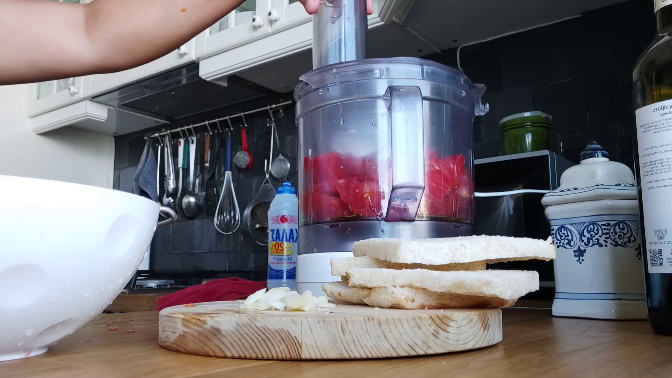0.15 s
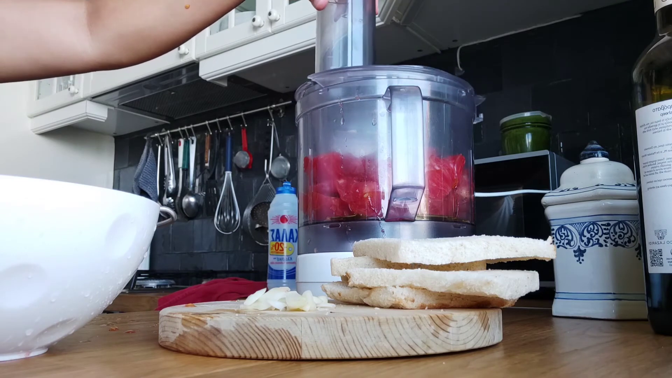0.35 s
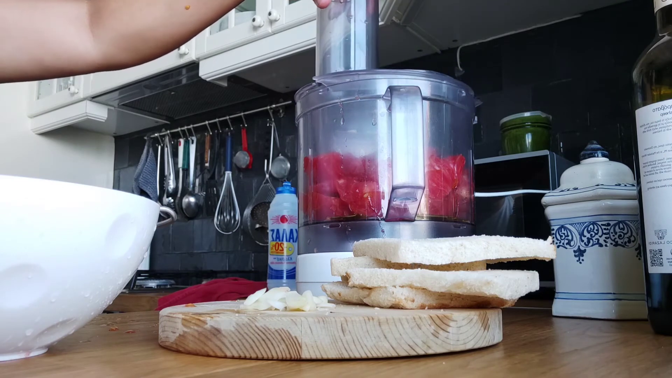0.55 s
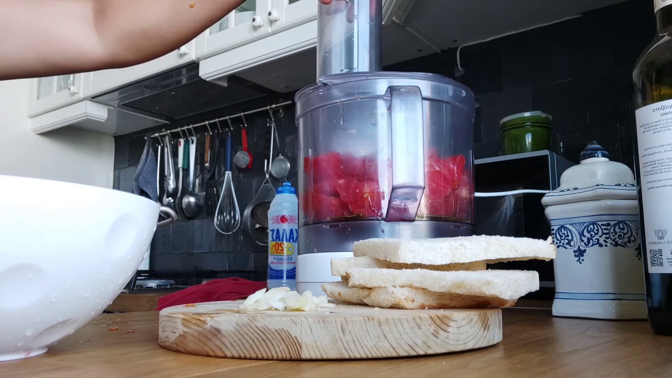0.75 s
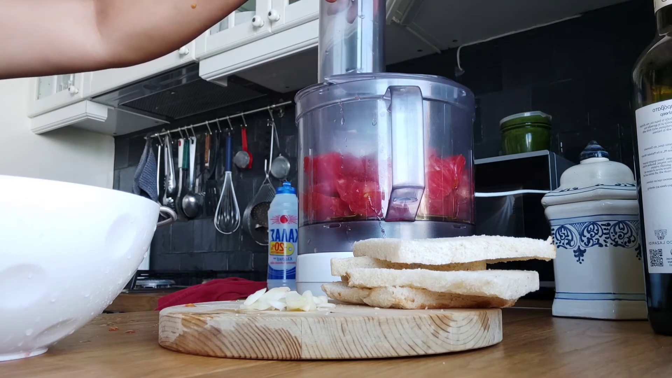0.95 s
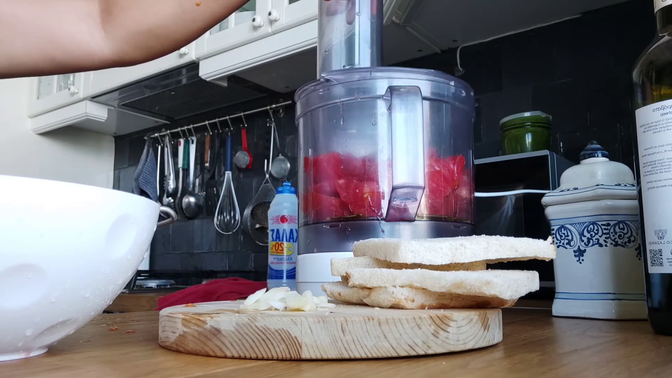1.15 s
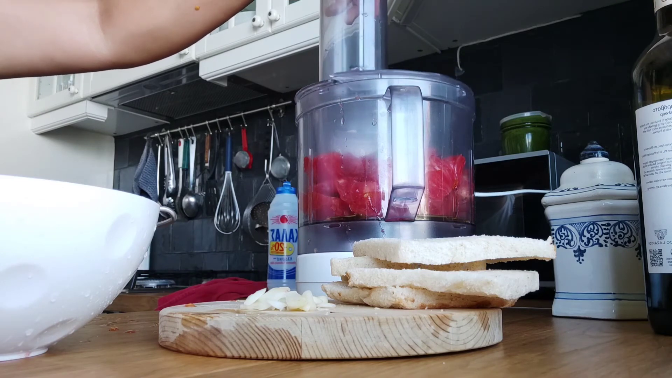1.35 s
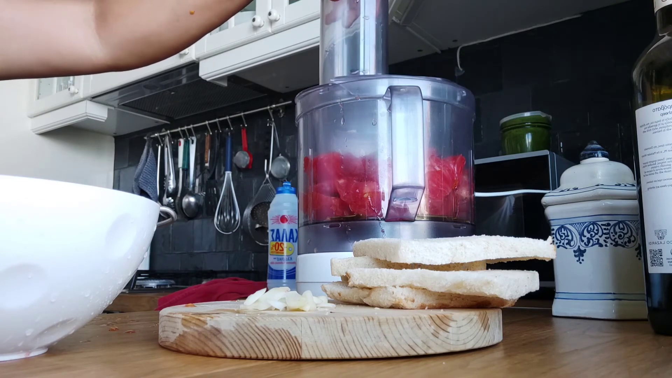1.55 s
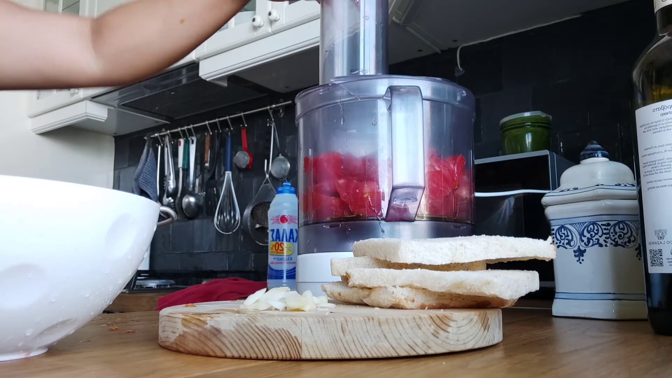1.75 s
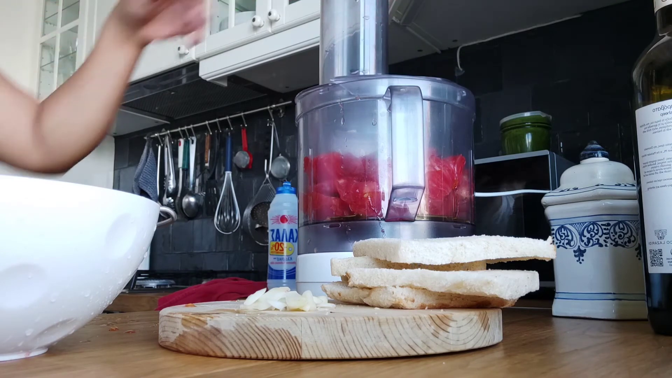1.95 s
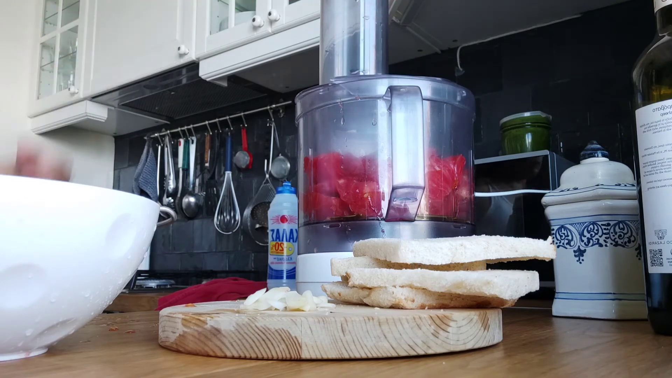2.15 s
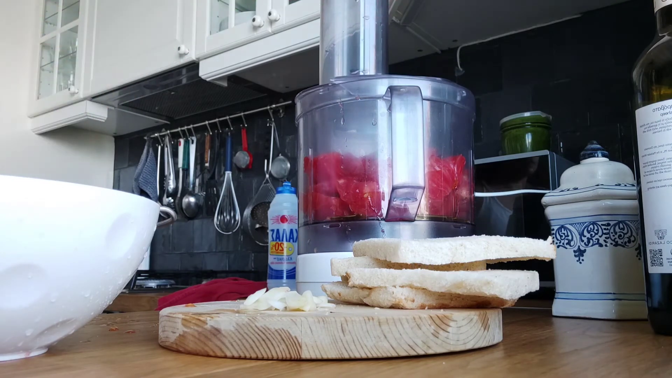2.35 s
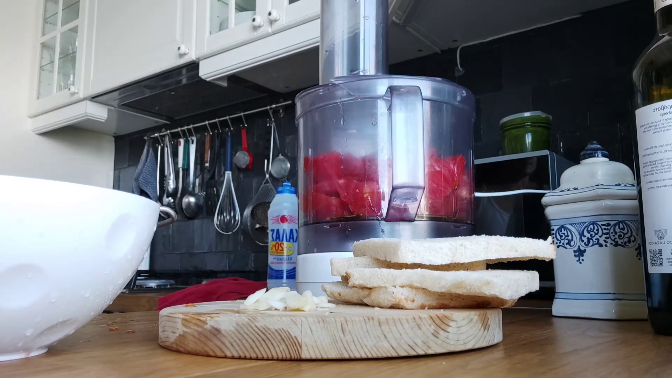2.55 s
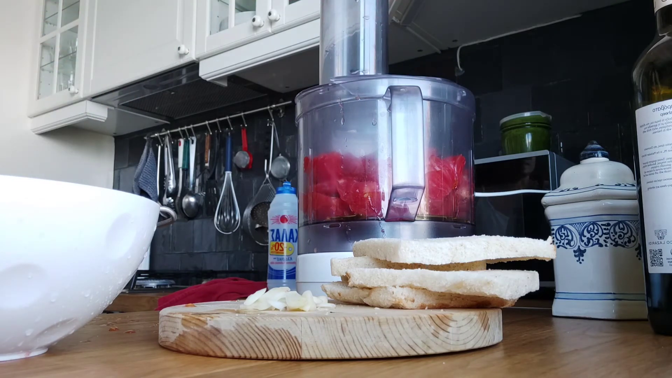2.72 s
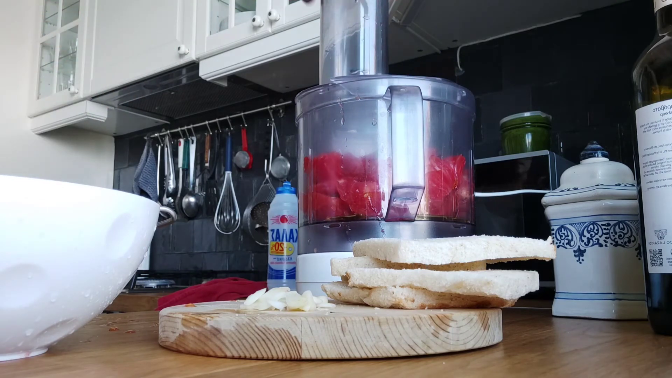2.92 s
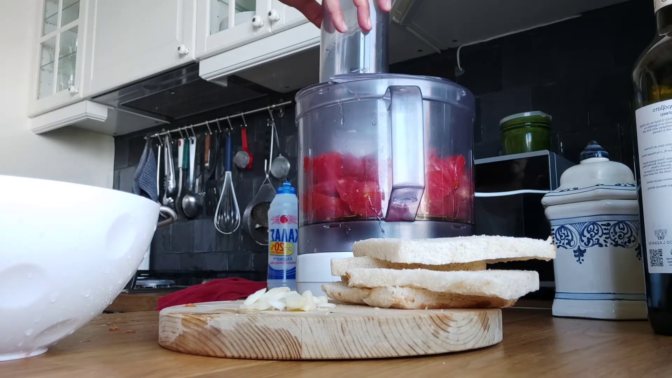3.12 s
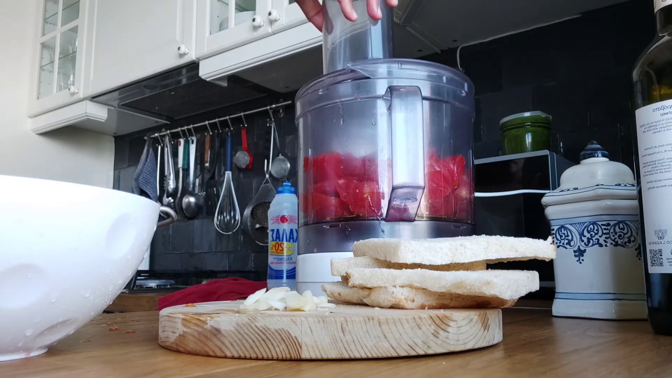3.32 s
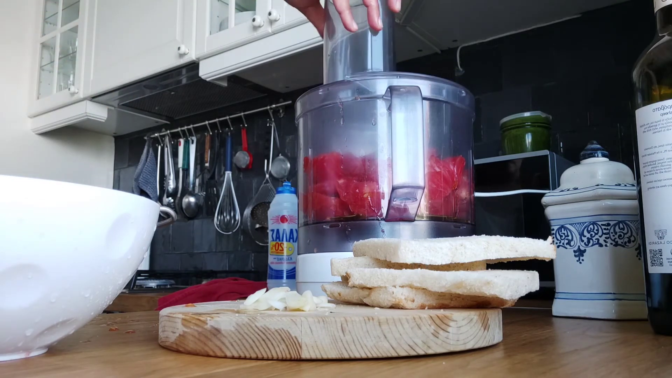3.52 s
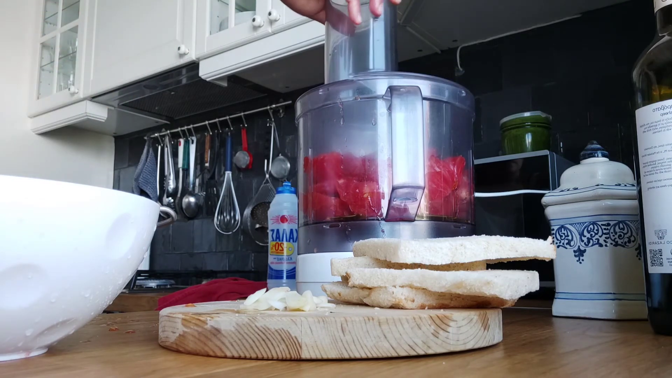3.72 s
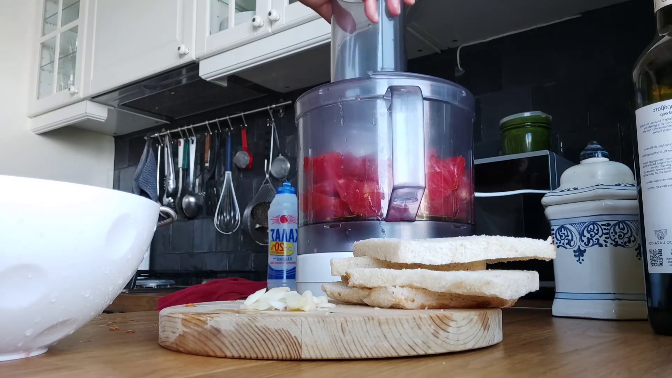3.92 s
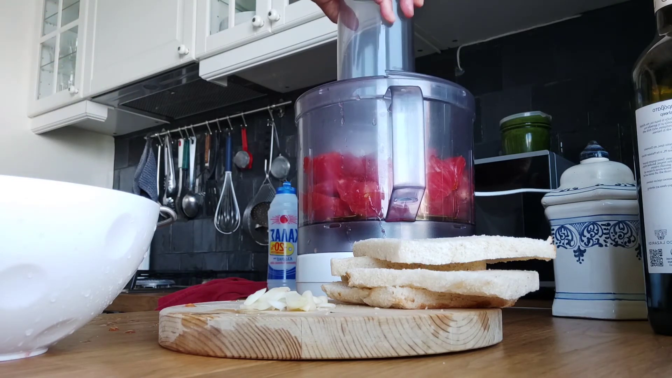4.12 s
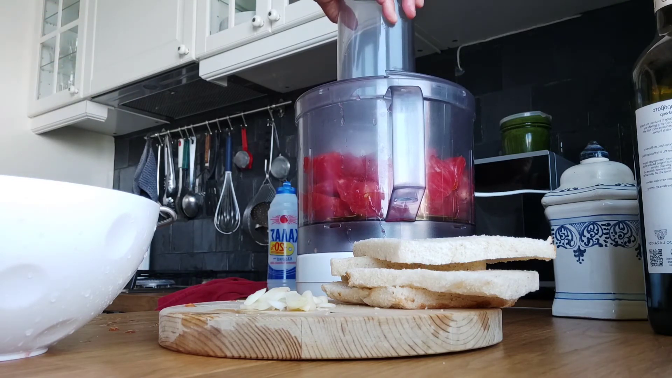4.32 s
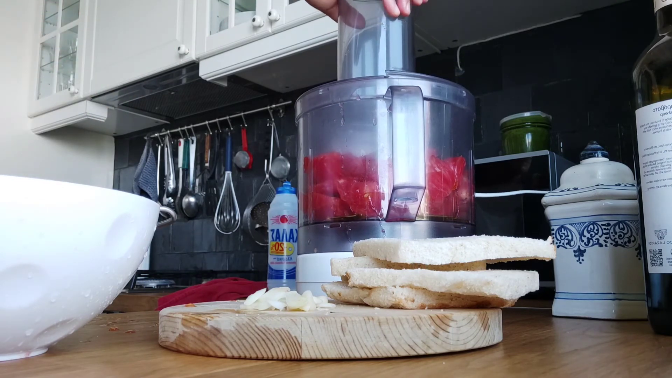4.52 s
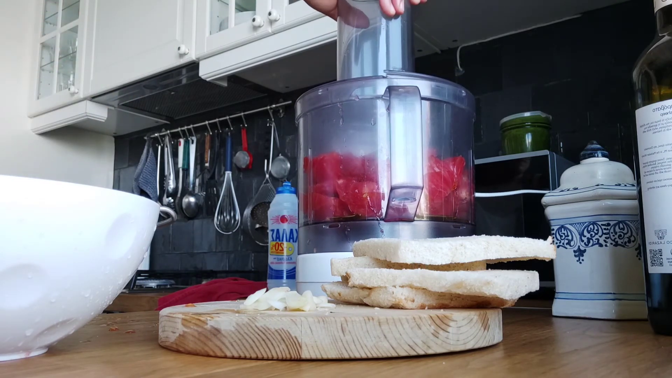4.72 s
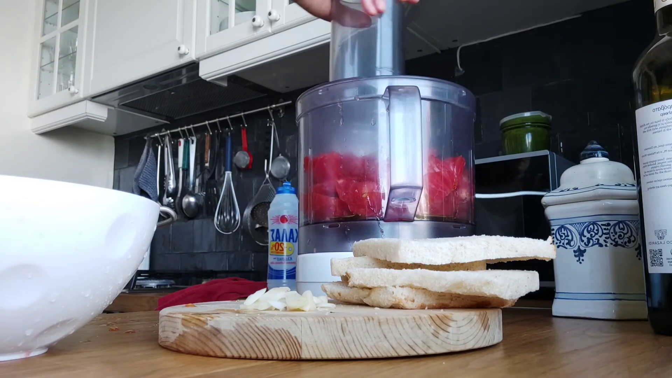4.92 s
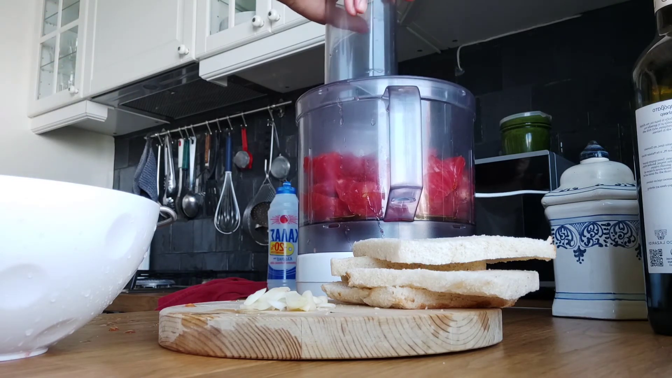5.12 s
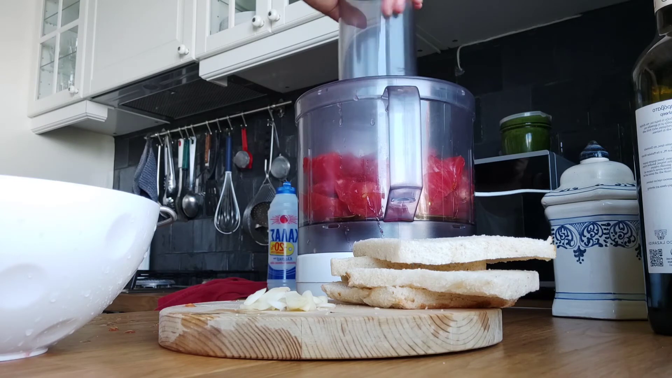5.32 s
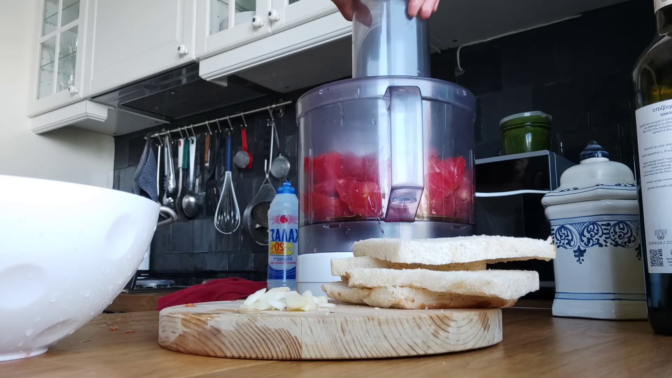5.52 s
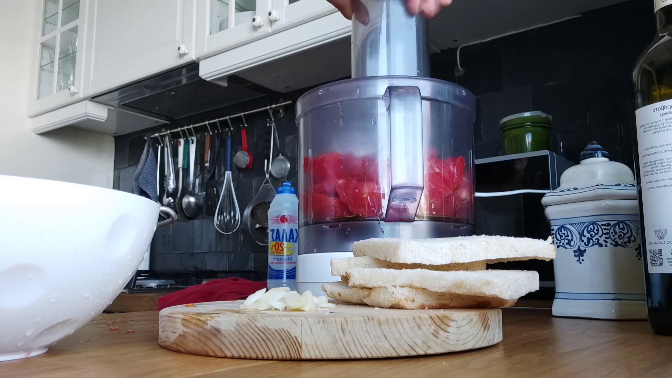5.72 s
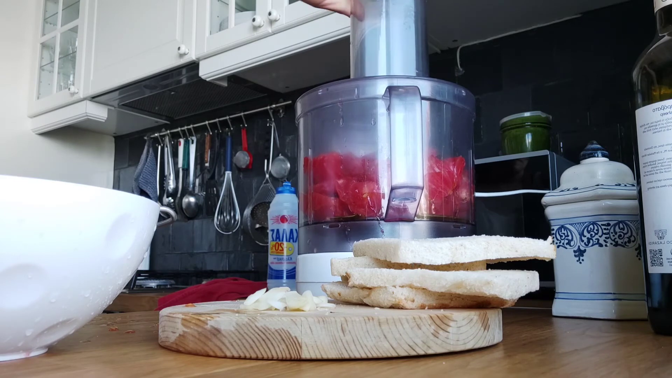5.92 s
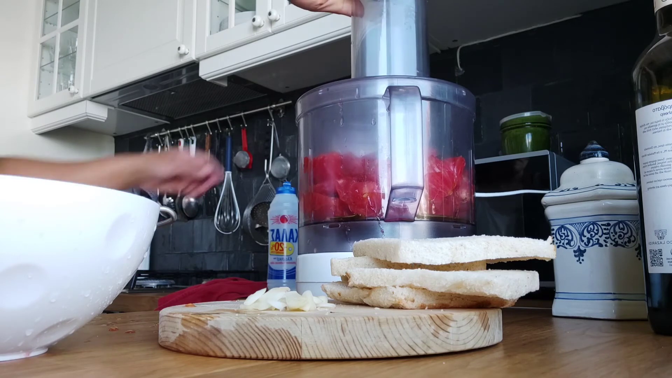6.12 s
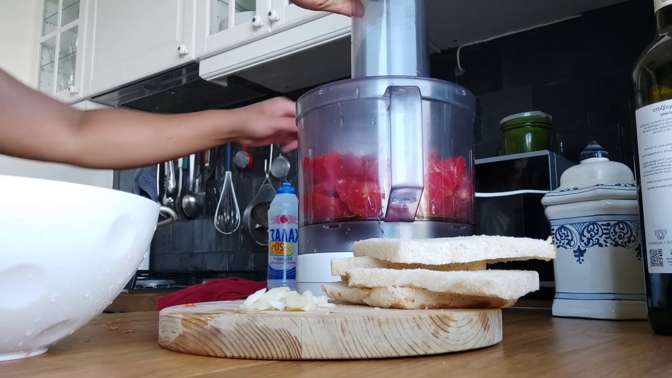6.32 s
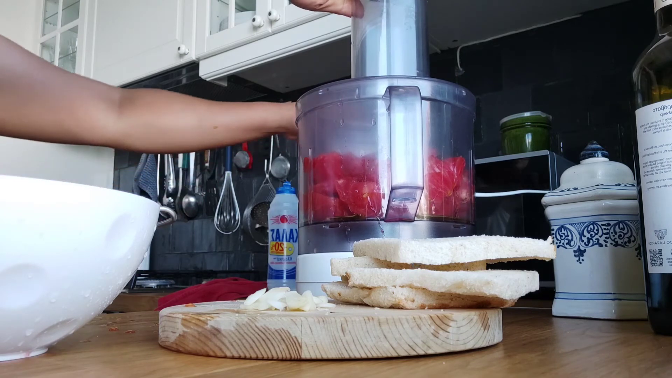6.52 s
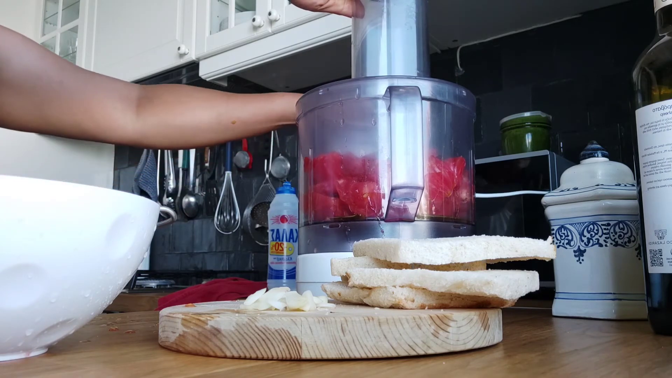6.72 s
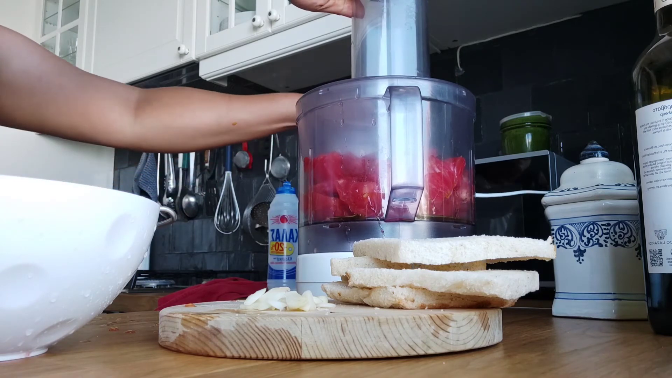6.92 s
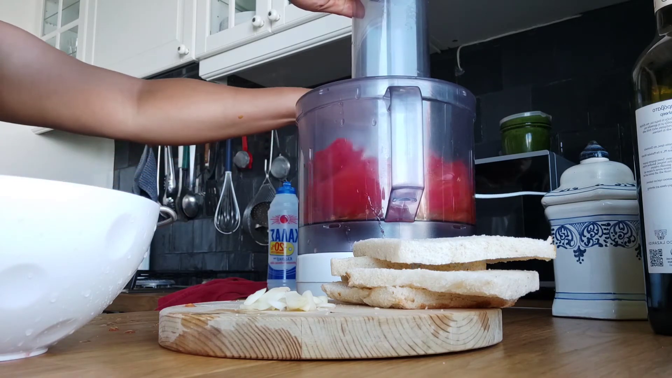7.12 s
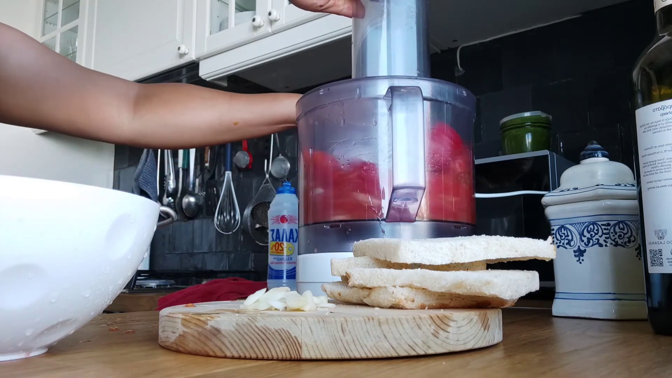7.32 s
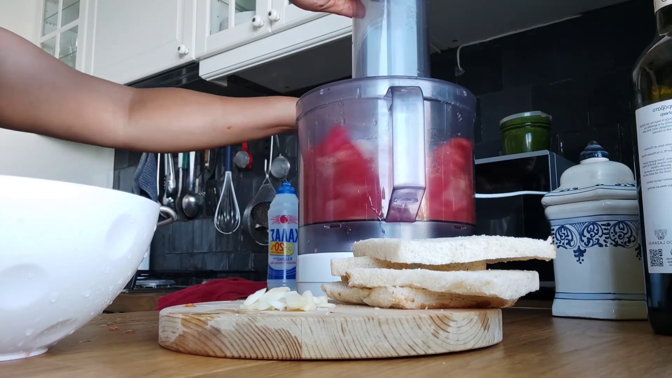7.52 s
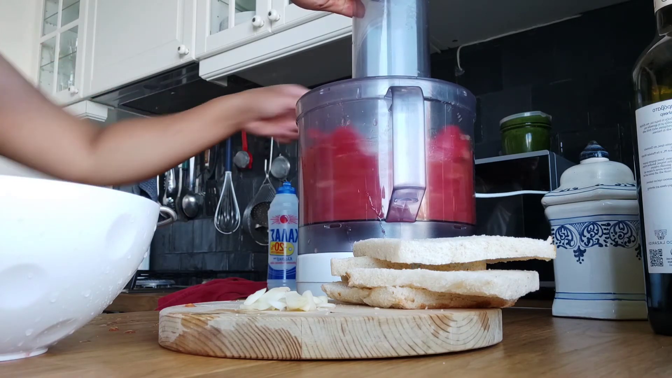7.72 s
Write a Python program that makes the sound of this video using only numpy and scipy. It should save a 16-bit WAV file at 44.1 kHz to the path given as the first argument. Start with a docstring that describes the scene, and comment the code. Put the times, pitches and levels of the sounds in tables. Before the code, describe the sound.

For the first 1.5 seconds, a plastic pusher clacks and rubs against a food processor's feed tube, making uneven, hollow knocks. A lull follows until about 3 seconds, with only low room rumble, microphone hiss and a faint rising hum. The knocks and scuffs resume irregularly, turning deeper as the pusher plugs the tube. At 4.9 seconds a hard knock starts a scraping, hissing slide, which ends in a sharp clack at 5.5 seconds as the pusher lands. A few light taps follow. At about 7.1 seconds the switch snaps and the motor leaps to speed with a loud, rough whine and a climbing squeal. The blades churn wet food, pieces slap the rattling bowl, and the machine is still running at the end, near 8 seconds. Everything is close, with a short kitchen echo.

```python
"""Food processor: pusher, then motor.

A plastic pusher rubs and knocks in the feed tube, ringing air column, wall and lid, then slides home.
The switch snaps, the motor whines up to speed and two knives churn food and throw it at the bowl.
A small kitchen echoes the blows and the rubbing; two hissy microphone ports colour everything."""
import sys
import numpy as np
from scipy import signal
from scipy.fft import rfft, irfft, next_fast_len
from scipy.io import wavfile

SR = 44100
rng = np.random.default_rng(int(sys.argv[2]) if len(sys.argv) > 2 else 0)


def digitize_waveform(pressure):
    """Quantize a signal to 16-bit integers and store it at the path in sys.argv[1].

    Rows of a 2-D input are taken as channels; values are limited to [-1, 1].
    """
    field = np.atleast_2d(pressure).T
    bounded = np.clip(field, -1, 1)
    quanta = np.round(bounded * 32767).astype(np.int16)
    wavfile.write(sys.argv[1], SR, quanta)


N = 346626
TIME = np.arange(N) / SR
LAND_S, START_S = 5.51, 7.11  # pusher lands, motor starts
DRIVE_HZ = 1070  # nominal drive tone

# Stereo likeness of noise. Each row: frequency in Hz, left-right correlation.
CORRELATION = [(50, 0.9), (200, 0.95), (500, 0.56), (1000, 0.078), (2200, 0.08), (4000, 0.011)]
# Room rumble and microphone hiss. Each row: frequency in Hz, density in dB per Hz.
FLOOR_DB = [(20, -74), (60, -77.5), (130, -82), (400, -82), (700, -86), (1050, -88), (1500, -99),
            (2400, -92.5), (3800, -99.5), (4400, -83), (6000, -83.5), (9000, -88.5), (10000, -101),
            (15000, -103)]
# Faint rising hum. Each row: time in seconds, pitch in Hz, level in dB.
HUM_TRACK = [(1.4, 57.7, -70), (1.9, 61.5, -49.5), (2.65, 65.7, -55.5), (3.0, 69.4, -63), (3.4, 68.6, -74)]
# Hum harmonics. Each row: multiple, gain in dB.
HUM_HARMONICS = [(1, 0), (3, -17), (6, -8)]

# Level curves. Each row: time in seconds, level in dB.
RIM_DB = [(0, -42), (.45, -62), (.7, -56), (1.25, -54.5), (1.4, -53), (1.6, -54), (1.8, -78)]  # pusher pressing on the rim
SLIDE_DB = [(4.93, -20), (5.09, -23.5), (5.22, -42), (5.5, -44)]  # sliding hiss, fading as the pusher slows
WHINE_DB = [(7.2, -43), (7.33, -41), (7.36, -30.5), (7.48, -29), (7.53, -40), (7.59, -33.5), (7.75, -32.5),
            (7.86, -37)]  # main motor whine
GRIND_DB = [(7.14, -46), (7.18, -34.5), (7.31, -36), (7.42, -44), (7.55, -41), (7.72, -38), (7.86, -40)]  # rough whine of the loaded drive

# Noise spectra. Each row: frequency in Hz, gain in dB.
SCRAPE_EQ = [(100, -37), (200, 4), (600, 6), (1100, 7.5), (1700, 6.5), (2800, 3.5), (3800, -1.5),
             (6000, 3.5), (9000, 7), (16000, -10)]  # scraped plastic
PLASTIC_EQ = [(50, -3.5), (110, -8.5), (170, 1.5), (260, -2.5), (400, 2), (600, 3.5), (800, -4), (1050, 0),
              (1400, -6.5), (2700, -7.5), (4000, -18.5), (8000, -14.5), (16000, -8)]  # struck plastic
RUB_EQ = [(70, -36), (130, -12), (175, -1), (215, 2), (260, -15), (480, -8), (800, -15), (1500, -23),
          (4000, -31)]  # pusher binding
CHURN_EQ = [(25, -19), (40, -21), (60, -18), (80, 1.5), (125, -5), (150, 0), (290, 1.5), (345, -1.5),
            (390, 7), (500, 1.5), (700, 3), (800, -5), (1200, -23)]  # churned food
BOWL_EQ = [(500, -13), (770, -8), (855, -0.5), (900, -5), (980, 1.5), (1030, 3), (1085, 7.5), (1150, -1),
           (1200, -6), (1300, -16.5), (2500, -31.5)]  # rattling bowl
AIR_EQ = [(600, -5), (1300, 2.5), (1800, 2), (2300, 0.5), (3200, -3.5), (4000, -11.5), (5000, -13),
          (5900, -3), (6500, -6.5), (7000, -9), (7600, -6.5), (9000, -6.5), (10500, -4), (15000, -18)]  # rushing air

# Resonances. Each row: frequency in Hz, gain in dB, t60 in seconds.
WALL_MODES = [(854, -2.5, 0.12), (980, 0, 0.079), (1080, 1, 0.068)]  # struck tube wall
LID_MODES = [(1454, 0.5, 0.056), (1557, 7.5, 0.062), (1684, 7, 0.059), (2142, -6, 0.077),
             (2356, -0.5, 0.07), (2730, -4.5, 0.1), (2910, -9.5, 0.21), (3220, -31, 0.21)]  # bowl and lid
TUBE_MODES = [(1060, 1, 0.045), (1724, -3, 0.04), (2320, -5, .025), (2895, -5.5, 0.042), (3130, 1, 0.01),
              (3680, -7, .03), (4180, -6, .02)]  # scraped tube
BASE_MODES = [(149, -5.5, 0.44), (197.8, -1.5, 0.22), (270, -8, 0.18), (382, 2, 0.14), (492, 5, 0.17),
              (523, 4.5, 0.32), (644, 3, 0.53), (712, 5, 0.22), (866, 6, 0.22)]  # motor base

# Scuffs swelling into a knock. Each row: start in seconds, end in seconds, final level in dB.
WALL_SCUFFS = [(0.918, .945, -43), (1.324, 1.458, -40), (3.19, 3.247, -42), (3.39, 3.425, -36),
               (3.988, 4.028, -42), (4.87, 4.916, -46.5)]
# Pusher and switch blows. Each row: start in seconds, clack in dB, thud and tick in dB re clack,
# length factor, hollow pitch in Hz, ring pitch in Hz, share of clean ringing from 0 to 1.
# The hollow pitch is high in the open tube, low once the pusher plugs it.
BLOWS = [(0.080, -37.5, -21, -37, 0.54, 500, 980, 0.57), (0.147, -47.5, 12.5, -5, 1.6, 395.6, 1075, 0.82),
         (0.258, -32.5, 7.5, -1.5, 1.2, 388, 853, 0.6), (0.317, -21, 1, -11.5, 1.15, 389, 945, 0.61),
         (0.346, -26, -1, -10, 0.95, 397, 1120, 0.75), (0.492, -30.5, -3.5, -39, 1.14, 382.5, 1080, 0.85),
         (0.6, -52, 11.5, -3, 0.66, 382, 1098, 0.83), (0.704, -42.5, -13, -19.5, 0.7, 397, 989, 0.7),
         (0.815, -24.5, -3, -15, 0.83, 375, 1094, 0.58), (0.943, -29.5, 6.5, -4, 1, 386, 820, 0.75),
         (1.255, -34, 15.5, 1, 0.97, 384, 1045, 0.91), (1.368, -50.5, 17, -5, 1.1, 388, 1075, 0.88),
         (1.453, -33.5, 7.5, 1, 0.95, 379, 1140, 0.8), (1.537, -41.5, 9, -20, 0.7, 384, 970, 0.43),
         (3.116, -41.5, 5, -2.5, 1.8, 377.4, 1070, 0.38), (3.249, -26.5, 1.5, 3, 1.35, 391, 1024, 0.56),
         (3.301, -33.5, 8, -3, 0.96, 376, 980, 0.73), (3.335, -38, -2, -14, .6, 391, 960, 1),
         (3.367, -30, 8, -13, 0.84, 468, 853, 0.47), (3.424, -19.5, 4, -3.5, 0.66, 518, 1040, 0.5),
         (3.445, -34, 7.5, -4, 0.57, 501, 1085, 0.76), (3.483, -30, 7, 3, 0.83, 277, 853, .4),
         (3.725, -41.5, -5, -6, 2.5, 225, 1100, 0.4), (3.77, -47.5, 11, -3, 0.81, 213, 1040, 0.64),
         (3.825, -42, 11.5, -3, 0.88, 218, 853, 0.73), (3.895, -25.5, -0.5, -7.5, 0.92, 271, 1090, 0.19),
         (3.96, -43, 7.5, -4, .6, 216, 830, 0.8), (4.012, -23.5, 4.5, -14, 0.87, 207, 870, 0.86),
         (4.075, -40, 5.5, -6, 0.89, 215, 970, 0.7), (4.149, -28, -1.5, 3, 0.63, 231, 1070, 0.16),
         (4.166, -31, -8.5, -15, 0.63, 394, 1030, 0.8), (4.392, -39, -22, -22, 1.2, 200, 834, 0.45),
         (4.466, -34, 4.5, -5.5, 0.89, 219, 847, 0.54), (4.509, -35, 0.5, -11, 0.65, 195, 1100, 0.34),
         (4.652, -41.5, 1, -30, 2.1, 390, 853, 0.44), (4.802, -40, 3.5, -12, 0.92, 200, 853, 0.5),
         (4.909, -17, -3, 6.5, 0.98, 208.6, 1075, 0.38), (5.106, -31.5, 0.5, 2, 0.88, 223, 1075, 0.43),
         (5.233, -34.5, -2, -14, 0.63, 189, 970, 1), (5.249, -37.5, 11, -8, 0.99, 338, 970, 0.47),
         (5.283, -29.5, -1, -8.5, 0.38, 259, 970, 0.3), (5.314, -32, 7, -4.5, 1.05, 167, 1024, .65),
         (5.415, -27.5, 2, -9, 1.55, 165.7, 853, 0.52), (5.449, -33.5, -1, -1, .6, 181, 960, 0.4),
         (5.465, -32.5, 8, -11, 0.57, 178, 970, 0.9), (5.509, -13.5, -4.5, 4, 0.68, 192.5, 853, 0.65),
         (5.83, -34.5, -4.5, -16, 0.78, 173, 1100, 0.5), (6.113, -44, 1, -4, 0.49, 204, 1090, 0.55),
         (6.22, -44.5, 1, -3.5, 1.05, 165, 850, 0.45), (6.28, -38.5, -5.5, -8, 0.84, 205, 853, 0.46),
         (6.477, -49.5, -2, 3, 0.87, 389, 1080, 0.3), (6.999, -35.5, 2, 0.5, 1.46, 465, 853, 0.36),
         (7.107, -16, 2, -4.5, 0.57, 533, 1030, 0.46)]
# Worktop, thud, clack, rattle and tick of a knock.
# Each row: low and high edge in Hz, gain in dB, base rise and base t60 in seconds.
KNOCK_BANDS = [(49.7, 154, -21.5, 0.0029, 0.29), (130, 850, 0, 0.0013, 0.22),
               (646, 1700, -1.5, 0.00084, 0.22), (1390, 5700, -4.5, 0.0013, 0.3),
               (3860, 11300, -5, 0.00027, 0.2)]
# Light hand touches. Each row: start in seconds, end in seconds, hollow pitch in Hz.
TOUCH_SPANS = [(1.089, 1.115, 388), (5.65, 5.761, 183)]
# Churning, rattling and rushing. Each row: level at nominal speed in dB, dB per doubling of speed,
# dB per second as the food gets finer.
RUN_DB = [(-18, 6.5, -2.5), (-19.5, 9, 1.5), (-22.5, 1.5, 1)]
# Climbing motor squeal. Each row: time in seconds, pitch in Hz, level in dB.
SQUEAL_TRACK = [(7.46, 1310, -49), (7.51, 1390, -34), (7.61, 1584, -34), (7.68, 1643, -43),
                (7.74, 1748, -34), (7.8, 1800, -28), (7.87, 1892, -37)]
# Smeared drive harmonics. Each row: multiple, width in Hz, level in dB.
SIZZLE_BANDS = [(6, 200, -39.5), (8, 200, -43.5)]
# Food pieces slapping the bowl at set times. Each row: start in seconds, level in dB.
CHUNK_HITS = [(7.245, -11), (7.3, -11.5), (7.362, -9), (7.52, -11.5), (7.575, -11.5), (7.808, -11)]
# Kitchen decay. Each row: frequency in Hz, t60 in seconds.
ROOM_T60_S = [(100, 0.81), (400, 0.57), (1500, 0.67), (4000, 0.87), (8000, 0.77), (12000, 0.33)]
# Microphone port colour. Each row: frequency in Hz, gain in dB.
LEFT_EQ = [(50, -1.5), (120, -1), (250, 2), (500, -3.5), (1000, 0), (2200, -2), (4000, -2), (6000, -4.5),
           (7300, -2.5), (8700, 2.5), (9300, 0.5), (9900, -14.5), (15000, -20.5)]
RIGHT_EQ = [(50, -5.5), (120, -7), (250, -4.5), (500, -4.5), (1000, -8), (2200, -1.5), (4000, 1),
            (6000, -2), (7300, 9), (8700, -0.5), (9300, -7.5), (9900, -15.5), (15000, -21)]


def amp(db):
    """Decibels to gain."""
    return 10 ** (np.asarray(db) / 20)


def unit_rms(x):
    """Scale to rms 1."""
    return x / np.sqrt(np.mean(x ** 2) + 1e-20)


def unit_onset(x):
    """Scale the first 20 ms to rms 1."""
    return x / np.sqrt(np.mean(x[:, :SR // 50] ** 2) + 1e-20)


def at_hz(points, hz):
    """Interpolate on a log-frequency axis."""
    knots_hz, values = np.transpose(points)
    return np.interp(np.log(hz + 1), np.log(knots_hz + 1), values)


def curve(rows, column=1):
    """One table column over time."""
    columns = np.transpose(rows)
    return np.interp(TIME, columns[0], columns[column])


def gate(start_s, stop_s=np.inf, *, fade_s):
    """Window with linear fades."""
    return np.clip((TIME - start_s) / fade_s, 0, 1) * np.clip((stop_s - TIME) / fade_s, 0, 1)


def add(mix, start_s, sound):
    """Mix in a stereo sound."""
    part = mix[:, max(round(start_s * SR), 0):][:, :sound.shape[1]]
    part += sound[:, :part.shape[1]]


def convolve(x, response):
    """Stereo convolution, cut to N."""
    return signal.oaconvolve(np.atleast_2d(x), response, axes=1)[:, :N]


def phase_rad(hz):
    """Running phase of a pitch curve."""
    return 2 * np.pi * np.cumsum(hz) / SR


def drift(rate_hz):
    """Low-passed noise, rms 1."""
    hz = np.fft.rfftfreq(N, 1 / SR)
    return unit_rms(irfft(rfft(rng.standard_normal(N)) * np.exp(-(hz / rate_hz) ** 2), N))


def scattered(start_s, stop_s, per_s):
    """Random times, one per equal slot, at least one."""
    count = max(round((stop_s - start_s) * per_s), 1)
    return start_s + (np.arange(count) + rng.random(count)) * (stop_s - start_s) / count


def noise(eq, size=N, band_hz=None):
    """Coloured stereo noise: alike in the bass, unrelated in the treble."""
    length = next_fast_len(size)
    hz = np.fft.rfftfreq(length, 1 / SR)
    mid, side = rfft(rng.standard_normal((2, length)))
    same = at_hz(CORRELATION, hz)
    mid, side = mid * np.sqrt((1 + same) / 2), side * np.sqrt((1 - same) / 2)
    gain = amp(at_hz(eq, hz))
    if band_hz:
        gain /= np.sqrt((1 + (band_hz[0] / (hz + 1)) ** 10) * (1 + (hz / band_hz[1]) ** 10))
    return irfft(np.array([mid + side, mid - side]) * gain, length)[:, :size]


def strike(t, rise_s, t60_s):
    """Gentle onset as the plastic gives, then exponential decay."""
    return (1 - np.exp(-t / rise_s)) ** 1.5 * np.exp(-np.log(1000) * t / t60_s)


def ringing(modes, t, rise_s, length=1, spread_db=3):
    """Damped modes, weighted at random by strike point; low ones reach both ports in step."""
    out = 0
    for hz, db, t60_s in modes:
        offset_rad = 2 * np.pi * rng.random() + 0.93 * min(hz / 1000, 2) * rng.standard_normal((2, 1))
        gain = amp(db + spread_db * rng.standard_normal())
        out += gain * np.sin(2 * np.pi * hz * t + offset_rad) * strike(t, rise_s, t60_s * length)
    return unit_onset(out)


def background(waver=0.00565):
    """Room rumble, microphone hiss and a faint hum."""
    hum_hz, hum_db = curve(HUM_TRACK), curve(HUM_TRACK, 2)
    angle = phase_rad(hum_hz * (1 + waver * drift(3.5)))
    hum = sum(amp(hum_db + db + drift(1.9)) * np.sin(k * angle) for k, db in HUM_HARMONICS)
    return noise(FLOOR_DB) * np.sqrt(SR / 2) + hum


def rim_rubbing(air_hz=384, squeak_hz=1560, squeak_db=-44, scuff_rise_db=8):
    """Rubbing and scuffs sound the air in the tube under a thin hiss; the rim squeaks once."""
    air_ring = ringing([(air_hz, 0, 0.055)], TIME[:SR // 4], rise_s=0.00033)
    squeak_ring = ringing([(squeak_hz, 0, 0.14)], TIME[:SR // 4], rise_s=0.00033)
    air = unit_rms(convolve(rng.standard_normal(N), air_ring))
    squeak = unit_rms(convolve(rng.standard_normal(N), squeak_ring))
    hiss = unit_rms(noise(SCRAPE_EQ))
    out = (air * amp(-1) + hiss * amp(-9)) * amp(curve(RIM_DB)) * gate(-1, 2.4, fade_s=0.1)
    scuff = air * amp(-8) + hiss
    for start_s, stop_s, db in WALL_SCUFFS:
        to_go = np.clip((stop_s - TIME) / (stop_s - start_s), 0, 1)
        out += scuff * amp(db - scuff_rise_db * to_go) * gate(start_s, stop_s, fade_s=0.004)
    return out + squeak * amp(squeak_db) * gate(1.34, 1.435, fade_s=0.012)


def wall_modes(ring_hz, reach_hz=70, off_db=-13.5):
    """A blow favours the wall mode nearest its ring pitch."""
    return [(hz, db + off_db * (1 - np.exp(-((hz - ring_hz) / reach_hz) ** 2)), t60_s)
            for hz, db, t60_s in WALL_MODES]


def knock(clack_db, thud_db, tick_db, length, hollow_hz, ring_hz, ring_share):
    """One blow: a crack, noise from worktop and dense plastic modes, ringing air column, wall and lid."""
    t = TIME[:SR // 3]
    rattle_db = clack_db - 2 + 0.61 * tick_db
    levels_db = [clack_db + thud_db, clack_db + thud_db, clack_db, rattle_db, clack_db + tick_db]
    ring_share = min(ring_share, 0.97)
    softness = 0.99 * np.exp(0.12 * thud_db)  # thudding blows swell more slowly
    top_hz = 9360 + 250 * max(clack_db + tick_db + 33.5, 0)  # harder ticks reach higher
    hollow = [(hollow_hz, 0, 0.28)]
    band_modes = [[], hollow, wall_modes(ring_hz), LID_MODES, []]
    crack = noise(PLASTIC_EQ, len(t), (1400, top_hz)) * strike(t, rise_s=0.00091, t60_s=0.011)
    out = amp(rattle_db - 7) * unit_onset(crack)
    for db, modes, (low_hz, high_hz, band_db, rise_s, t60_s) in zip(levels_db, band_modes, KNOCK_BANDS):
        choke = 1
        if modes is hollow:
            low_hz, high_hz = max(low_hz, 0.55 * hollow_hz), min(high_hz, 3.27 * hollow_hz)
            choke = np.exp(-(t / (0.038 * length)) ** 4)  # the seating pusher stops the note
        band = noise(PLASTIC_EQ, len(t), (low_hz, min(high_hz, top_hz)))
        part = unit_onset(band * strike(t, rise_s * softness, t60_s * length))
        if modes:
            ring = ringing(modes, t, rise_s * softness, length, spread_db=0) * choke
            part = unit_onset(np.sqrt(1 - ring_share) * part + np.sqrt(ring_share) * ring)
        out += amp(db + band_db) * part
    return out


def knocks(level_db=-1, pan_db=0.1, graze_s=0.006, rebound_s=0.02):
    """Pusher and switch knock; hard blows graze first and rebound, duller. Light touches fall between."""
    out = np.zeros((2, N))
    for start_s, clack_db, thud_db, tick_db, length, *tone in BLOWS:
        add(out, start_s, knock(clack_db, thud_db, tick_db, length, *tone))
        if clack_db > -24.5:
            add(out, start_s - graze_s, knock(clack_db - 14, thud_db, tick_db - 3, length, *tone))
        if clack_db > -25:
            rebound_db = clack_db - 5.5 + min(clack_db + 12.5, 0)  # shrinks fast as the blow weakens
            add(out, start_s + rebound_s, knock(rebound_db, thud_db, tick_db - 10, 1.3, *tone))
    for start_s, stop_s, hollow_hz in TOUCH_SPANS:
        for touch_s in scattered(start_s, stop_s, per_s=5):
            ring_hz = rng.choice([mode[0] for mode in WALL_MODES])
            touch = knock(clack_db=rng.normal(-40, 2), thud_db=2, tick_db=-8, length=1.6,
                          hollow_hz=hollow_hz, ring_hz=ring_hz, ring_share=0.35)
            add(out, touch_s, touch)
    return out * amp(level_db + np.array([[1], [-1]]) * pan_db / 2)


def slips(per_s):
    """Friction as sparse random impulses."""
    return rng.standard_normal(N) * (rng.random(N) < per_s / SR)


def tube_scrape(level_db=-9, swell_db=3):
    """Quick slips ring the tube; its modes swell and fade as the contact slides along."""
    force = slips(per_s=700)
    out = 0
    for hz, db, t60_s in TUBE_MODES:
        ring = ringing([(hz, 0, t60_s)], TIME[:SR // 10], rise_s=0.00051)
        out += unit_rms(convolve(force, ring)) * amp(db + swell_db * drift(25))
    return unit_rms(out) * amp(level_db + curve(SLIDE_DB)) * gate(4.91, LAND_S, fade_s=0.013)


def pusher_slide(bind_s=5.24, bind_db=9.5, chatter_db=0.3, catch_db=3):
    """Plastic on plastic: hiss, slips that ring the wall, and a low rub that grows where it binds."""
    slide_db = curve(SLIDE_DB)
    rub_db = -46 + bind_db * gate(bind_s, LAND_S, fade_s=0.015)
    force = slips(per_s=160)
    hiss = unit_rms(noise(SCRAPE_EQ)) * amp(slide_db - 4 + chatter_db * drift(120))
    ring = ringing(wall_modes(856), TIME[:SR // 4], rise_s=0.00092)
    wall = unit_rms(convolve(force, ring)) * amp(slide_db - 19)
    rub = unit_rms(noise(RUB_EQ)) * amp(rub_db + catch_db * drift(31))
    return (hiss + wall + rub) * gate(4.915, LAND_S, fade_s=0.029)


def run_time_s():
    """Time since switch-on."""
    return np.maximum(TIME - START_S, 0)


def drive_hz(kick=0.48, spin_up_s=0.165, creep_hz_per_s=60):
    """The motor leaps to speed, then creeps up as the load eases."""
    age_s = run_time_s()
    return (DRIVE_HZ + creep_hz_per_s * age_s) * np.tanh(kick + age_s / spin_up_s)


def run_levels_db(surge_db=4, surge_s=7.29, width_s=0.042):
    """Churn, rattle and rush follow speed and time; the churn surges as the knives catch the load."""
    doublings = np.log2(drive_hz() / DRIVE_HZ)
    churn_db, rattle_db, rush_db = [db + db_per_doubling * doublings + db_per_s * run_time_s()
                                    for db, db_per_doubling, db_per_s in RUN_DB]
    return churn_db + surge_db * np.exp(-((TIME - surge_s) / width_s) ** 2), rattle_db, rush_db


def blade():
    """Two knives sweep the food round: lumpy churning, a rattling bowl and rushing air."""
    churn_db, rattle_db, rush_db = run_levels_db()
    lumps_db = 2 * drift(70)
    churn = unit_rms(noise(CHURN_EQ)) * amp(churn_db - 3.5 + lumps_db)
    rattle = unit_rms(noise(BOWL_EQ)) * amp(rattle_db - 1 + 0.69 * lumps_db + 1.28 * drift(120))
    rush = unit_rms(noise(AIR_EQ)) * amp(rush_db - 2)
    return (churn + rattle + rush) * gate(START_S, fade_s=0.023)


def shaking(cycles_per_pass=27.3, winding_hz=100, flutter_db=2):
    """The unbalanced blade shakes the worktop; the windings hum most while the motor starts."""
    knife_rad = phase_rad(drive_hz() / cycles_per_pass)
    winding_rad = 2 * np.pi * winding_hz * TIME
    out = 0
    for angle, db in [(knife_rad, -47), (2 * knife_rad, -41), (winding_rad, -39 - 16 * run_time_s())]:
        out += amp(db + flutter_db * drift(17)) * np.sin(angle + 2 * np.pi * rng.random())
    return out * gate(START_S, fade_s=0.026)


def motor(waver=0.0016, flutter_db=1.5):
    """The drive tone and a clean whine an octave up waver with the load; a squeal climbs."""
    pitch_hz = drive_hz()
    drive_rad = phase_rad(pitch_hz * (1 + waver * drift(30)))
    squeal_hz, squeal_db = curve(SQUEAL_TRACK), curve(SQUEAL_TRACK, 2)
    squeal_rad = phase_rad(squeal_hz * (1 + waver * drift(38)))
    tones = [(drive_rad, -30), (2 * drive_rad, curve(WHINE_DB)),
             (squeal_rad, squeal_db), (2 * squeal_rad, squeal_db - 13)]
    out = 0
    for angle, db in tones:
        port_rad = 0.5 * rng.standard_normal((2, 1))
        out += np.sqrt(2) * np.sin(angle + port_rad) * amp(db + flutter_db * drift(25))
    return out * (pitch_hz / pitch_hz.max()) ** 2 * gate(7.12, fade_s=0.061)


def grinding(waver=0.018, judder_db=1.5):
    """The loaded drive judders, smearing harmonic 3 into a rough whine and higher ones into a sizzle."""
    pitch_hz = drive_hz()
    drive_rad = phase_rad(pitch_hz)
    rough_rad = phase_rad(3 * pitch_hz * (1 + waver * drift(260)))
    whine = np.sqrt(2) * np.sin(rough_rad + 0.5 * rng.standard_normal((2, 1)))
    whine *= amp(curve(GRIND_DB) + judder_db * drift(140))
    sizzle = np.zeros((2, N))
    for multiple, width_hz, db in SIZZLE_BANDS:
        angle = multiple * drive_rad
        for port in sizzle:
            port += amp(db) * (drift(width_hz) * np.cos(angle) + drift(width_hz) * np.sin(angle))
    return whine * gate(7.12, fade_s=0.088) + sizzle * gate(7.3, fade_s=0.14)


def scraps(per_s=240, spread_db=4, splash_kinds=6):
    """Wet scraps fly off the knives; each spatters on the wall and jolts the motor base."""
    churn_db, _, rush_db = run_levels_db()
    spatter, jolts = 0, 0
    for _ in range(splash_kinds):
        landed = rng.random(N) < per_s / splash_kinds / SR
        hits = landed * amp(spread_db * np.minimum(rng.exponential(1, N), 4))
        splash = noise(AIR_EQ, 1024) * strike(TIME[:1024], rise_s=0.0003, t60_s=0.017)
        spatter += convolve(hits, splash)
        jolts += hits * rng.choice([-1, 1], N)
    base = convolve(jolts, ringing(BASE_MODES, TIME[:SR // 3], rise_s=0.0025, spread_db=1.5))
    out = unit_rms(spatter) * amp(rush_db - 7.5) + unit_rms(base) * amp(churn_db - 7)
    return out * gate(7.12, fade_s=0.091)


def chunks(level_db=-11):
    """Soft pieces slap the bowl wall, which the food damps quickly."""
    out = np.zeros((2, N))
    envelope = strike(TIME[:SR // 8], rise_s=0.00079, t60_s=0.19)
    pieces = [(start_s, -11.5 - rng.standard_normal()) for start_s in scattered(7.2, N / SR, per_s=16)]
    for start_s, db in list(CHUNK_HITS) + pieces:
        for eq in (CHURN_EQ, BOWL_EQ):  # thud, clack
            add(out, start_s, amp(level_db + db) * unit_onset(noise(eq, len(envelope)) * envelope))
    return out


def kitchen(x, onset_s=0.0019):
    """Diffuse tail, each band at its own decay rate; tiles throw back much treble."""
    white = noise([(20, 0), (20000, 0)], SR)
    hz, t, bands = signal.stft(white, SR, nperseg=256)
    t60_s = at_hz(ROOM_T60_S, hz)[:, None]
    wet_db = at_hz([(300, -10), (1500, -9), (7000, -5)], hz)[:, None]
    decay = np.exp(-np.log(1000) * t / t60_s) * np.sqrt(2 * np.log(1000) / (t60_s * SR))  # unit energy
    _, tail = signal.istft(bands * amp(wet_db) * decay, SR, nperseg=256)
    return convolve(x, tail[:, :SR] * np.clip(TIME[:SR] / onset_s, 0, 1))


def scene():
    """Handling and chunks with kitchen echo, plus machine and background."""
    near = knocks() + rim_rubbing() + pusher_slide() + tube_scrape() + chunks()
    return near + kitchen(near) + blade() + scraps() + motor() + grinding() + shaking() + background()


def record(dry):
    """Minimum-phase port colour, soft peak limit, low-pass."""
    peak_limit, cutoff_hz = 0.85, 15800
    hz = abs(np.fft.fftfreq(2048, 1 / SR))
    log_gain = np.log(amp([at_hz(LEFT_EQ, hz), at_hz(RIGHT_EQ, hz)]))
    ports = np.fft.ifft(np.exp(np.conj(signal.hilbert(log_gain)))).real
    coloured = convolve(dry, ports)
    limited = coloured / (1 + (coloured / peak_limit) ** 6) ** (1 / 6)
    low_pass = signal.firwin(255, cutoff_hz, window=("kaiser", 9), fs=SR)
    return signal.oaconvolve(limited, low_pass[None], "same")


dry = scene()
out = record(dry)
digitize_waveform(out)
```